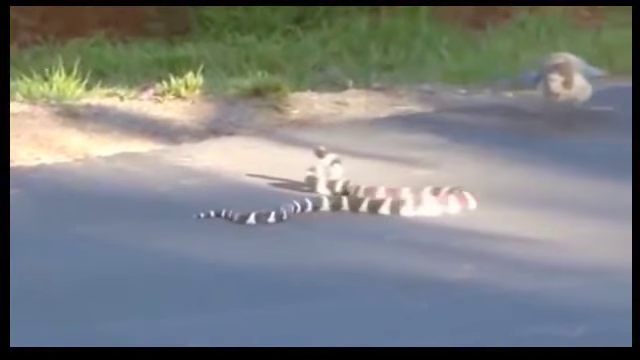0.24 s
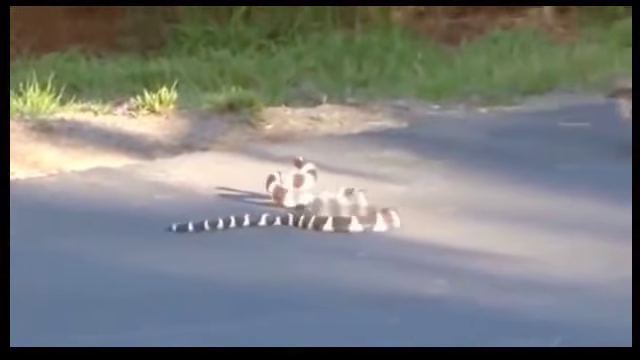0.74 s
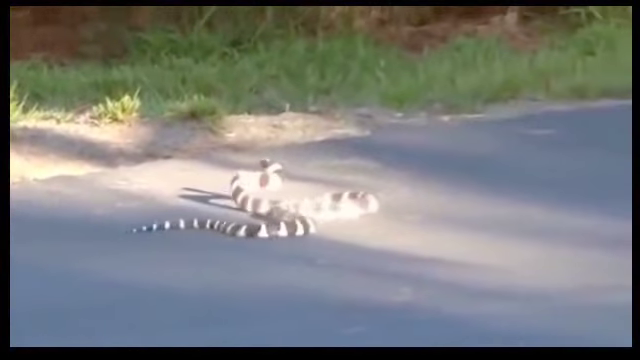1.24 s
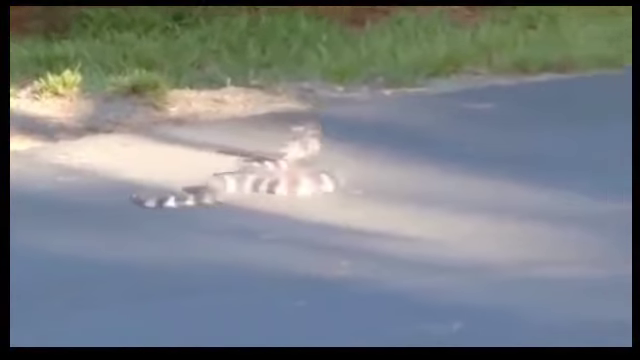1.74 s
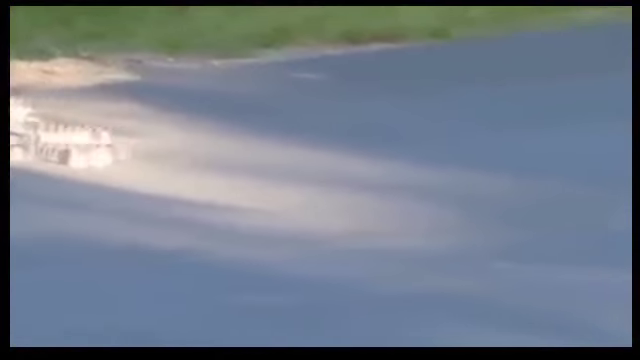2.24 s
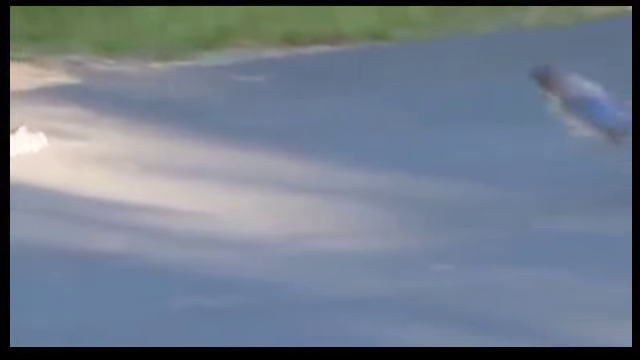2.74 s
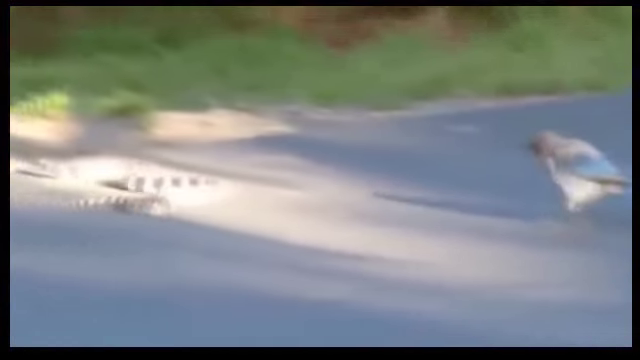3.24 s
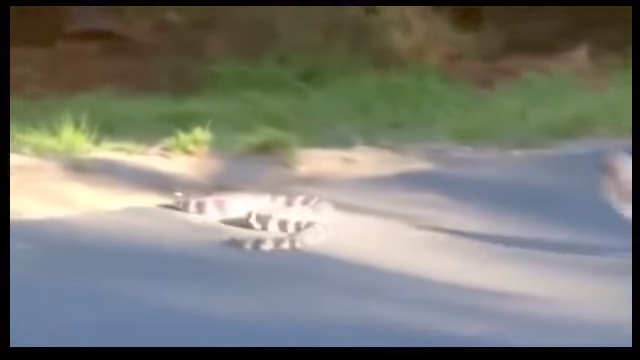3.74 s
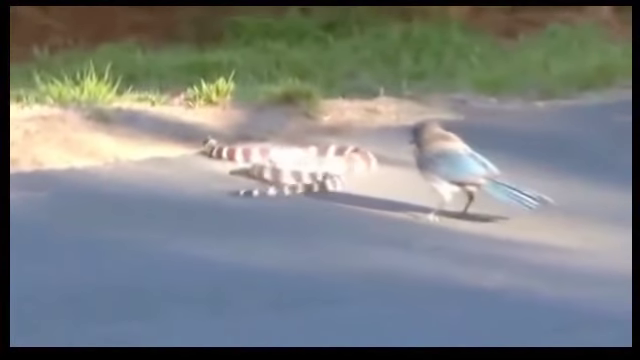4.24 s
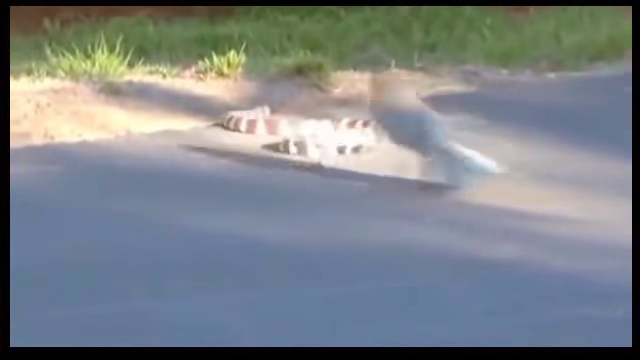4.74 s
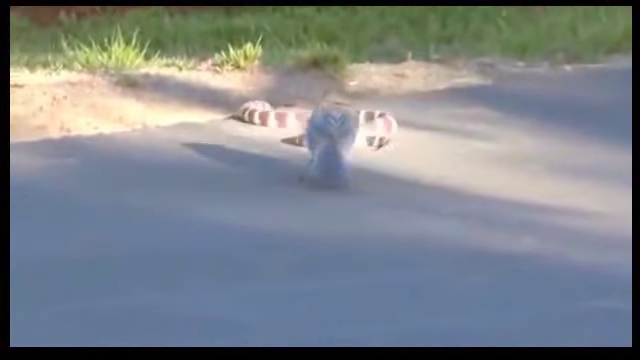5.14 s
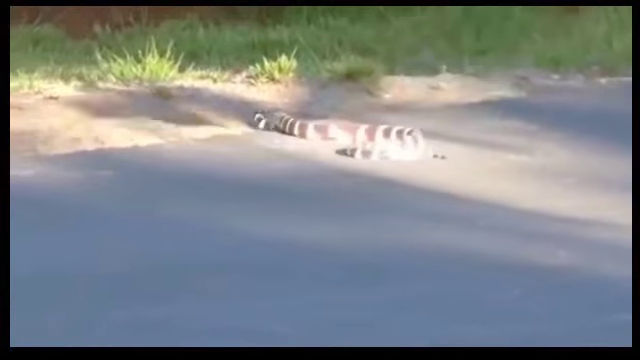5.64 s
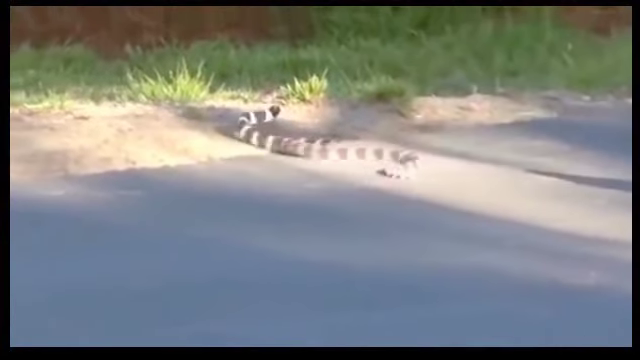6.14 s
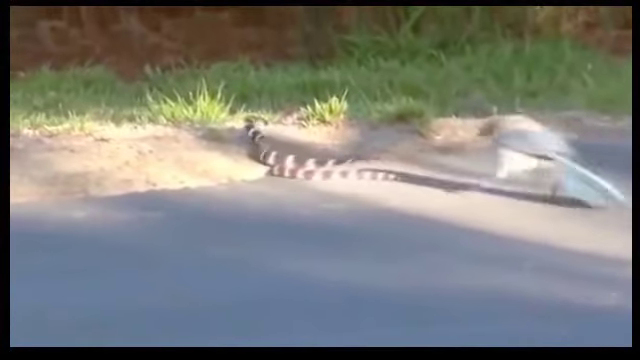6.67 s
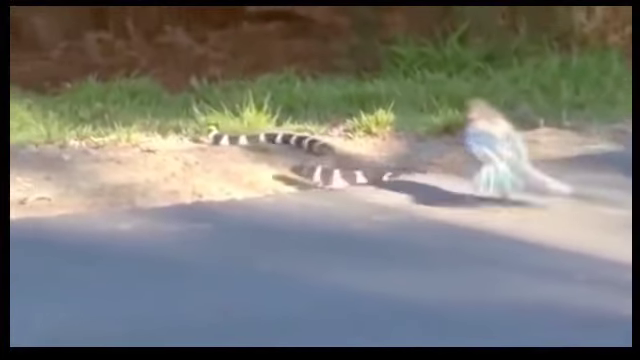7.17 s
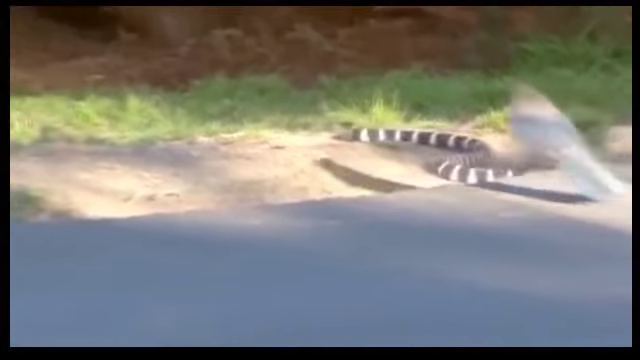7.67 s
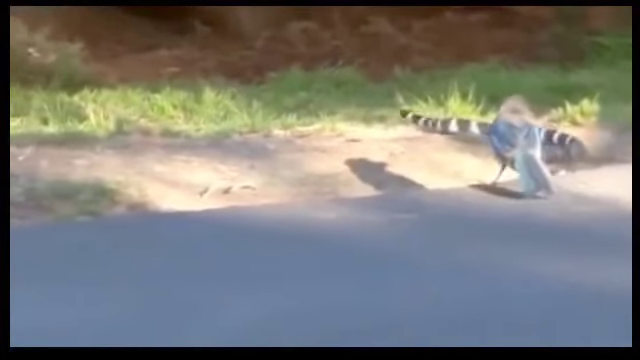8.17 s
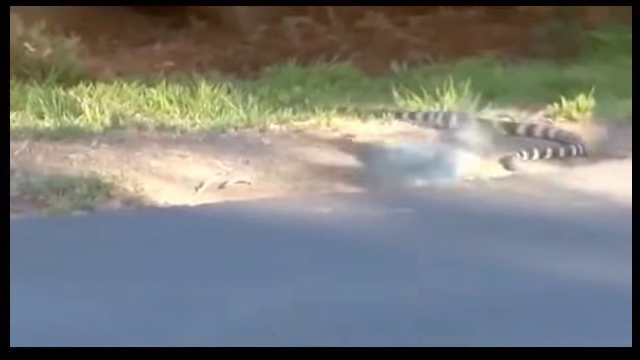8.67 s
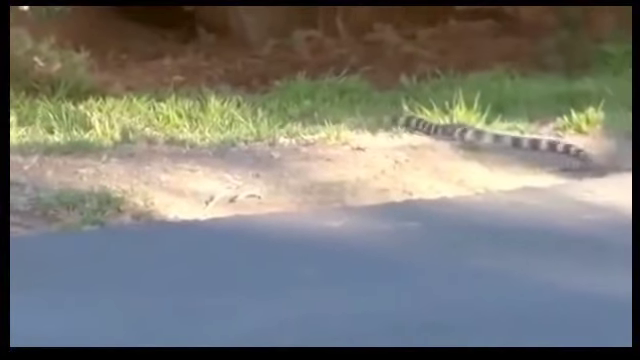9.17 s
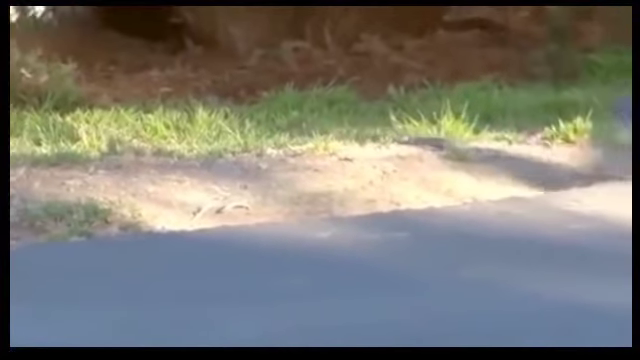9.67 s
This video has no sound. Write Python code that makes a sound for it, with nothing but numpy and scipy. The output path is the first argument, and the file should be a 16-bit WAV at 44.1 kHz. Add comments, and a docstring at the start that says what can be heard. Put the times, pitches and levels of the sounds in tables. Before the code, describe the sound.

Outdoors by a quiet road, a jay a few metres off scolds in single harsh, rising rasps of about a third of a second, slightly right, with a short echo. Calls come one to two seconds apart and grow quieter. Three much louder, crisp plastic camera clicks snap close at the left, near the start, middle and end. Faint hush and hardly any wind lie beneath.

```python
"""Jay scolding by a country road

A jay calls a few metres off: rising, rasping overtones of one gliding pitch, ringing briefly off the verges.
A camera mechanism close to the left microphone clicks as struck case resonances, with noise ticks from its
button and soft sine knocks on the grip. Under it lie distant hush, a faint far hiss and light wind, heard
mostly at the right microphone, all made from filtered noise.
"""
import sys
import numpy as np
from scipy import signal
from scipy.fft import rfft, irfft
from scipy.io import wavfile
from scipy.ndimage import uniform_filter1d

SR = 44100
rng = np.random.default_rng(int(sys.argv[2]) if len(sys.argv) > 2 else 0)


def wav_record(signal):
    """Record a signal, one row per channel, as 16-bit PCM in the file named by sys.argv[1]."""
    frames = np.transpose(np.atleast_2d(signal))
    bounded = np.clip(frames, -1, 1)
    # unit amplitude maps onto the largest positive 16-bit level
    quanta = np.round(bounded * 32767).astype(np.int16)
    wavfile.write(sys.argv[1], SR, quanta)


N = 437031
TOP_HZ = 14700  # highest frequency of the voice and of the recorder


def undb(db):
    """Decibels to gain."""
    return 10 ** (np.asarray(db) / 20)


def unit(x):
    """Scale to rms 1."""
    return x / np.sqrt(np.mean(x ** 2))


def pan(db):
    """Left and right gains for a left minus right level difference."""
    return undb(np.array([[db], [-db]]) / 2)


def on_log(table, hz):
    """Read (Hz, dB) points on a log-frequency axis."""
    f, db = np.transpose(table)
    return np.interp(np.log(hz + 1), np.log(f), db)


def colour(x, table):
    """Shape the spectrum of x by (Hz, dB) points."""
    n = x.shape[-1]
    gain = undb(on_log(table, np.fft.rfftfreq(n, 1 / SR)))
    return irfft(rfft(x) * gain, n)


def band(x, hz, width_hz):
    """Resonance with gain 1 at its centre."""
    return signal.lfilter(*signal.iirpeak(hz, hz / width_hz, fs=SR), x)


def walk(n, rate):
    """Smooth random wander, about rate changes a second, spread 1."""
    k = int(SR / rate)
    noise = rng.standard_normal(n + 2 * k)
    smooth = uniform_filter1d(uniform_filter1d(noise, k), k)
    return unit(smooth[k:n + k])


def add(out, sound, s):
    """Mix a sound in at time s."""
    i = int(s * SR)
    a, b = max(i, 0), min(i + sound.shape[-1], N)
    out[..., a:b] += sound[..., a - i:b - i]


# Pitch climb of one call, before stretching: time_s after the onset, share of the top pitch [ratio]
PITCH_GLIDE = [(0, .25), (.022, .34), (.038, .46), (.06, .574), (.127, .76), (.195, .845), (.22, .935),
               (.252, .98), (.28, 0.99)]
# Resonances of throat and beak: freq_hz, gain_db
THROAT_GAIN = [(500, -33), (1300, -24), (1750, -9), (2400, -3), (3050, -7.5), (3750, 4.5), (4500, -2.5),
               (5200, -8.5), (7100, -13.5), (8800, -27), (10900, -45.5), (13000, -31.5), (15000, -68)]
# Low voice (mostly under 3.2 kHz), thinning as the beak opens: time_s after the onset, gain_db
CHEST_GAIN = [(0, 10), (.13, 4.5), (.23, -11.5)]
# When the early, middle and late levels of a call are reached: time_s after the onset
EFFORT_TIMES = (0.053, 0.15, 0.26)
CLIMB_S = .19  # where the climb gives way to the warbled ending
ATTACK_S, HOLD_END_S, RELEASE_S, END_S = .028, .22, 0.28, 0.29
ONSET_DB, SAG_DB, END_DB = -12, -8, -29  # at the onset, at RELEASE_S and at END_S
CREAK_HZ, CREAK_REST, CREAK_EXTRA, CREAK_FADE_S = 100.4, .15, .55, .03  # the extra depth fades from the onset
WARBLE_HZ, WARBLE_DEPTH, WARBLE_AT_S, WARBLE_SPAN_S = 75.6, 0.081, 0.2206, .035
EDGE_PEAK_DB, EDGE_AT_S, EDGE_SPAN_S = 2, 0.11, 0.047  # over about 5 kHz: 1 dB down one span from its peak


def call(climb, ending, top_hz, chest_offset_db, effort_db):
    """Syrinx overtones glide up, each fluttering alone; creak chops the start, a warble bends the end, breath rasps."""
    n = int(.36 * SR)
    time_s = np.arange(n) / SR
    # stretched clock: climb and ending run at their own speeds
    climb_end_s = CLIMB_S * climb
    t = np.interp(time_s, [0, climb_end_s, climb_end_s + ending], [0, CLIMB_S, CLIMB_S + 1])
    share = np.interp(t, *np.transpose(PITCH_GLIDE))
    level_db = np.interp(t, [0, ATTACK_S, HOLD_END_S, RELEASE_S, END_S], [ONSET_DB, 0, 0, SAG_DB, END_DB])
    level_db = level_db + np.interp(t, EFFORT_TIMES, effort_db)
    rasp = np.interp(t, (0.087, .2), [0.582, .22])  # the voice clears as it climbs
    creak = CREAK_REST + CREAK_EXTRA * np.exp(-(t / CREAK_FADE_S) ** 2)
    warble = np.exp(-((t - WARBLE_AT_S) / WARBLE_SPAN_S) ** 2)
    chest_db = np.interp(t, *np.transpose(CHEST_GAIN)) + chest_offset_db
    edge_db = EDGE_PEAK_DB - ((t - EDGE_AT_S) / EDGE_SPAN_S) ** 2

    # creak and warble both run at unsteady rates
    flutter = np.cos(2 * np.pi * np.cumsum(CREAK_HZ * (1 + 0.157 * walk(n, 57.0))) / SR)
    bend = np.sin(2 * np.pi * np.cumsum(WARBLE_HZ * (1 + 0.141 * walk(n, 56.6))) / SR)
    pitch_bend = WARBLE_DEPTH * warble * np.tanh(1.75 * bend)
    hz = top_hz * share * (1 + pitch_bend + 0.0451 * rasp * walk(n, 530))
    phase = 2 * np.pi * np.cumsum(hz) / SR

    tones = np.zeros(n)
    for k in range(1, 18):
        # uneven membranes: higher overtones lose step with the lower ones
        slip = .018 * k ** 3 * np.sqrt(rasp) * walk(n, 400)
        overtone = np.cos(k * phase + 2 * np.pi * rng.random() + slip)
        tones += overtone * undb(2.5 * walk(n, 166)) * (k * hz < TOP_HZ)
    tones = tones * np.sqrt(share)
    breath = 1.5 * rasp * rng.standard_normal(n)
    voice = colour(unit(tones) + breath, THROAT_GAIN)

    chest = colour(voice, [(2850, 0), (3500, -40)])
    edge = colour(voice, [(4700, -40), (5500, 0)])
    voice = voice + (undb(chest_db) - 1) * chest + (undb(edge_db) - 1) * edge
    # the lungs hold the loudness steady
    voice = voice / np.sqrt(uniform_filter1d(voice ** 2, int(.012 * SR)))
    chop = np.clip(1 - creak + 1.3 * creak * np.maximum(flutter, 0), 0, None)
    return voice * chop * undb(level_db) * (t < END_S)


# The jay's calls: start_s (below 0: already under way), climb_stretch [ratio], ending_stretch [ratio],
# top_pitch_hz, chest_db, early_db, middle_db, late_db, left_minus_right_db
JAY_CALLS = [(-.21, 0.99, 1.02, 1507, -1.5, -27, -26.5, -25, -9),
             (.806, 1, 0.9, 1521, -1, -34.5, -33, -24.5, -6.5),
             (2.513, 1.008, 0.99, 1519, -2.5, -31.5, -31, -28.5, -5.5),
             (3.409, 1.003, 0.96, 1523, 0.5, -38, -37, -30.5, -5.5),
             (4.586, 1.01, 1.1, 1512, 2.5, -37.5, -39, -34.5, -4.5),
             (6.19, 1.01, .8, 1517, 1, -40, -34, -33, -5.5),
             (7.565, 1.04, 1.13, 1531, 3.5, -38, -37.5, -36, -5.5),
             (9.56, 1, 1.11, 1526, 3, -36.5, -36.5, -36.5, -6)]
VERGE_T60_S, VERGE_DB = 0.36, -3.5


def jay():
    """All calls, straight and by way of the verges: an echo of decaying noise, separate at each microphone."""
    # one second of lead-in holds a call that has already begun
    direct, mono = np.zeros((2, N + SR)), np.zeros(N + SR)
    for s, climb, ending, top_hz, chest_db, *effort_db, pan_db in JAY_CALLS:
        sound = call(climb, ending, top_hz, chest_db, effort_db)
        i = int((s + 1) * SR)
        direct[:, i:i + len(sound)] += (pan(pan_db) * sound)[:, :N + SR - i]
        mono[i:i + len(sound)] += sound[:N + SR - i]
    t = np.arange(int(.6 * SR)) / SR
    echo = rng.standard_normal((2, len(t))) * undb(-60 * t / VERGE_T60_S) * (t > .012)
    echo = echo * undb(VERGE_DB) / np.sqrt(np.sum(echo ** 2, axis=1, keepdims=True))
    verges = signal.fftconvolve(mono[None], echo)[:, :N + SR]
    return (direct + verges)[:, SR:]


# Camera clicks: start_s, peak_db, left_minus_right_db, rattle_spacing_s, brightness [dB per octave],
# treble_db, pitch_factor set by the grip [ratio], ring_2khz_db
CAMERA_CLICKS = [(0.353, -5, 12, .00108, 2.5, -1, 0.99, 1), (4.6738, -2.5, 8, .0013, 3, 4, 0.97, -0.5),
                 (9.8051, -2.5, 7, 0.001106, 6, -8, 0.944, -9)]
# The latch's blow and its bounces, one row each: left_db, right_db, treble_db
LATCH_BLOWS = [(4, -26, 5), (5.5, 1, -2), (-9, -6, 16), (-17, 2.5, 6)]
# Resonances of the plastic case: freq_hz, left_db, right_db, t60_s
CASE_MODES = [(487, -36, -8.5, 0.015), (1026, -28, -29, 0.09), (1202, 1.5, -9.5, 0.023),
              (1700, -31, -26.5, 0.092), (2020, 13, -10, 0.015), (2405, -32, -27, 0.11),
              (2742, 10.5, 0, 0.011), (3410, -4, -22, 0.0077), (4130, -13, -7.5, 0.006),
              (5680, -26, -13.5, 0.004), (7200, -17, -16.5, 0.0047), (8600, -13, -21, 0.005),
              (10940, -14, -24, 0.007)]


def clicks():
    """A latch strikes and bounces, ringing the plastic case; a short dull rustle dies after it."""
    out, t = np.zeros((2, N)), np.arange(int(.2 * SR)) / SR
    hz, *mode_db, t60 = np.transpose(CASE_MODES)[:, :, None]
    for s, peak_db, pan_db, spacing, bright_db, top_db, grip, ring_db in CAMERA_CLICKS:
        sound = np.zeros((2, len(t)))
        for k, (*blow_db, treble_db) in enumerate(LATCH_BLOWS):
            age = np.maximum(t - k * spacing, 0)
            ring = np.sin(2 * np.pi * hz * grip * age) * undb(-60 * age / t60)
            ring = ring * (1 - np.exp(-age / 0.0011))
            tilt_db = bright_db * np.log2(np.minimum(hz, 4200) / 2000)
            tilt_db = tilt_db + (treble_db + top_db) * (hz > 3200)
            tilt_db = tilt_db + ring_db * (np.abs(hz - 2000) < 100)
            for side in range(2):
                uneven_db = 1.8 * rng.standard_normal(hz.shape)
                gain = undb(mode_db[side] + blow_db[side] + tilt_db + uneven_db)
                sound[side] += np.sum(gain * ring, axis=0)
        rustle = unit(band(band(rng.standard_normal(sound.shape), 1600, 2100), 1940, 2900))
        sound += 0.21 * rustle * undb(-60 * t / 0.073) * (1 - np.exp(-t / 0.0035))
        sound = signal.sosfilt(signal.butter(3, 450, "high", fs=SR, output="sos"), sound)
        sound = sound / np.abs(sound).max(axis=1, keepdims=True)
        add(out, sound * pan(pan_db) * undb(peak_db), s)
    return out


# Dry ticks of the button: start_s, level_db, left_minus_right_db, centre_hz, width_hz
BUTTON_TICKS = [(4.492, -34.5, 1, 2400, 4000), (9.372, -44, 11, 1300, 900), (9.384, -50.5, 0, 6900, 4000),
                (9.393, -39, -1, 2440, 4200)]


def ticks():
    """A few milliseconds of coloured noise each, partly shared by the two microphones."""
    out, t = np.zeros((2, N)), np.arange(int(0.021 * SR)) / SR
    for s, db, pan_db, hz, width_hz in BUTTON_TICKS:
        noise = rng.standard_normal(len(t)) + .5 * rng.standard_normal((2, len(t)))
        burst = unit(band(band(noise, hz, width_hz), hz, width_hz))
        burst = burst * (t / 0.0011) * np.exp(1 - t / 0.0011)
        add(out, pan(pan_db) * undb(db) * burst, s)
    return out


# Soft knocks on the grip: start_s, level_db, pitch_hz, left_minus_right_db
GRIP_KNOCKS = [(3.469, -46, 175, -6), (4.545, -59, 90, -9), (4.574, -53, 90, -6), (5.119, -35, 290, -9)]


def thumps():
    """A dull sine for each knock, swelling and dying within milliseconds."""
    out, t = np.zeros((2, N)), np.arange(int(.04 * SR)) / SR
    swell = (t / 0.0021) * np.exp(1 - t / 0.0018)
    for s, db, hz, pan_db in GRIP_KNOCKS:
        add(out, pan(pan_db) * undb(db) * np.sin(2 * np.pi * hz * t) * swell, s)
    return out


# Gusts at the microphones: peak_s, level_db, fade_s per 10 dB (negative: goes on growing after peak_s)
WIND_GUSTS = [(1.45, -80, .3), (2.81, -80, 0.5), (3.45, -69, 0.2), (4.05, -70, 0.13), (4.55, -62, 0.12),
              (5.05, -63, 0.2), (5.55, -73, 0.03), (6.11, -74, 0.4), (9.8, -76, -2)]
BREEZE_DB, BREEZE_SWING_DB, GUST_RISE_S = -84.5, 2.5, .04  # a gust rises 10 dB in GUST_RISE_S


def wind():
    """Breeze and gusts: low rumbling noise, partly shared by the microphones and stronger at the right one."""
    t = np.arange(N) / SR
    noise = rng.standard_normal(N) + 0.77 * rng.standard_normal((2, N))
    rumble = unit(band(band(noise, 86, 130), 87, 133))
    strength = undb(BREEZE_DB + BREEZE_SWING_DB * walk(N, 3.4))
    for s, db, fade in WIND_GUSTS:
        strength = strength + undb(db - 10 * np.maximum((s - t) / GUST_RISE_S, (t - s) / fade))
    return rumble * pan(-15.5) * strength * undb(1.7 * walk(N, 9.7))


# Spectrum of the distant hush: freq_hz, relative level_db per Hz
HUSH_SPECTRUM = [(15, -21), (25, -52.5), (118, -15), (150, -15.5), (186, -11), (318, -5.5), (655, 0),
                 (1030, -2), (9770, -21.5), (13800, -35.5), (15000, -28)]
# Hush at the two microphones: freq_hz, left_minus_right_db
HUSH_SIDES = [(60, 9), (110, -13), (200, -10), (380, -6.5), (690, -4.5), (1280, 3.5), (2350, 6), (4340, 4),
              (8000, 2), (14800, -11.5)]
# Slow course of the hush: time_s, level_db
HUSH_COURSE = [(0.0, -56), (2.5, -57), (5.5, -57.5), (9.91, -58.5)]


def hush():
    """Distant hush: coloured noise, unrelated at the two microphones, its level wandering slightly."""
    t = np.arange(N) / SR
    noise = colour(rng.standard_normal((2, N)), HUSH_SPECTRUM)
    scale = np.std(band(noise[0], 530, 767))  # the level refers to this band
    sides = []
    for channel, sign in zip(noise, (1, -1)):
        tilt = [(f, sign * db / 2) for f, db in HUSH_SIDES]
        sides.append(colour(channel, tilt))
    level_db = np.interp(t, *np.transpose(HUSH_COURSE)) + 0.35 * walk(N, 3.1)
    return np.array(sides) / scale * undb(level_db)


# One faint far hiss: peak_s, spread_s, centre_hz, width_hz, level_db
FAR_HISS = (8.14, 0.045, 7600, 1000, -66)


def far_hiss():
    """A band of noise that swells and fades once, alike at both microphones."""
    t = np.arange(N) / SR
    s, spread, hz, width_hz, db = FAR_HISS
    noise = unit(band(rng.standard_normal(N), hz, width_hz))
    return noise * undb(db) * np.exp(-((t - s) / spread) ** 2)


def scene():
    """Bird, camera and surroundings."""
    return jay() + clicks() + ticks() + thumps() + wind() + hush() + far_hiss()


def record(dry):
    """The recorder clips at full scale and cuts the top."""
    top_cut = signal.ellip(10, .2, 80, TOP_HZ, fs=SR, output="sos")
    return signal.sosfilt(top_cut, np.clip(dry, -1, 1))


dry = scene()
out = record(dry)
wav_record(out)
```